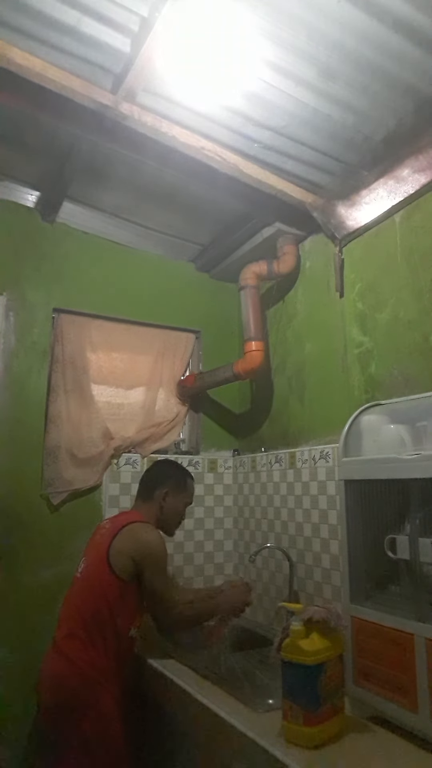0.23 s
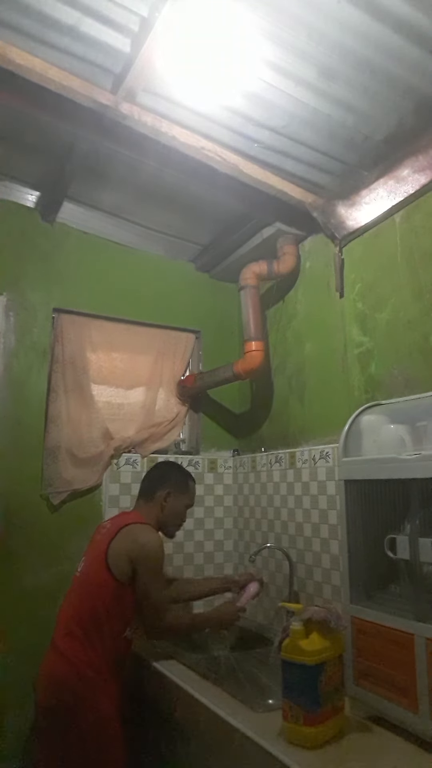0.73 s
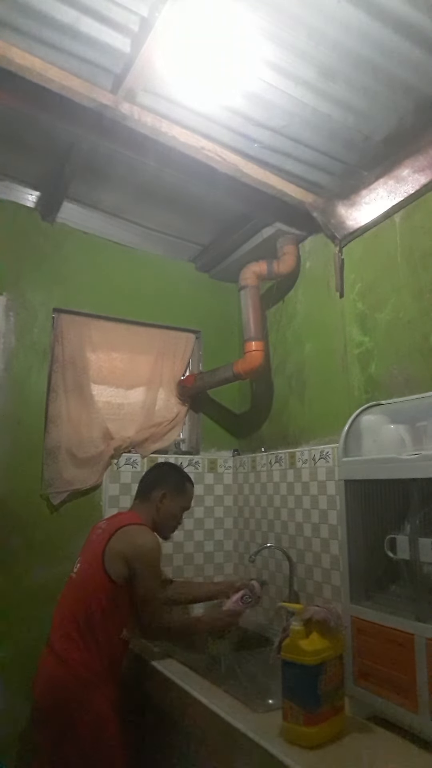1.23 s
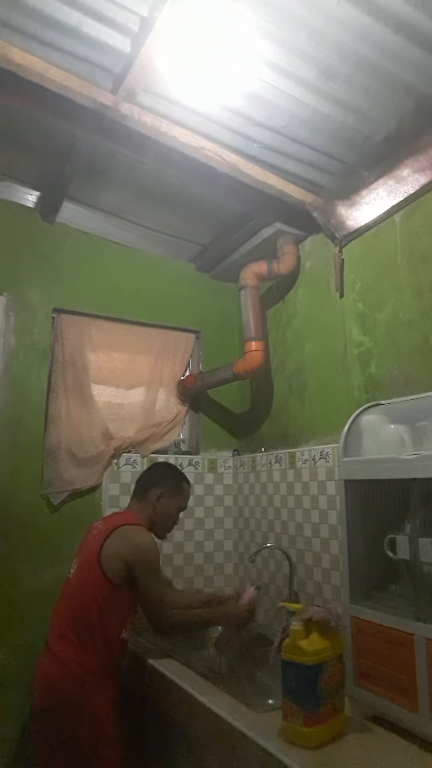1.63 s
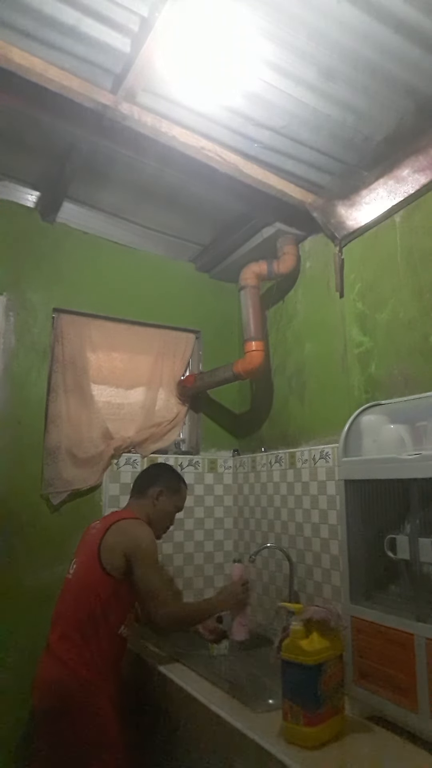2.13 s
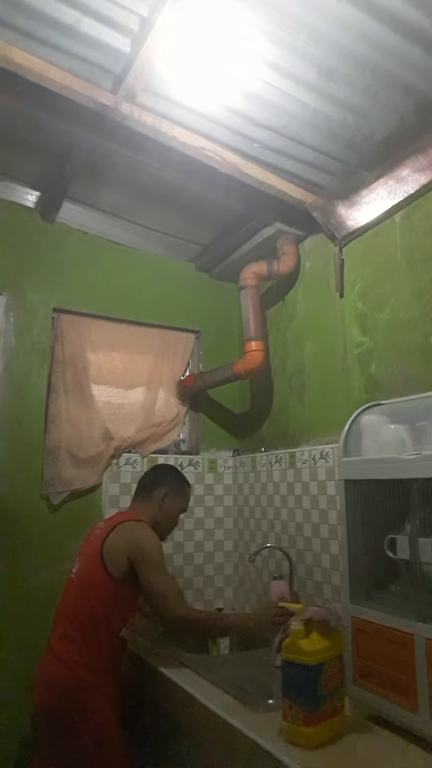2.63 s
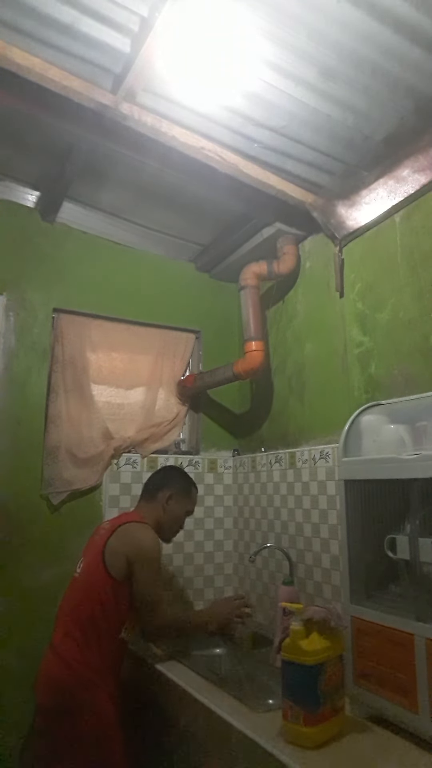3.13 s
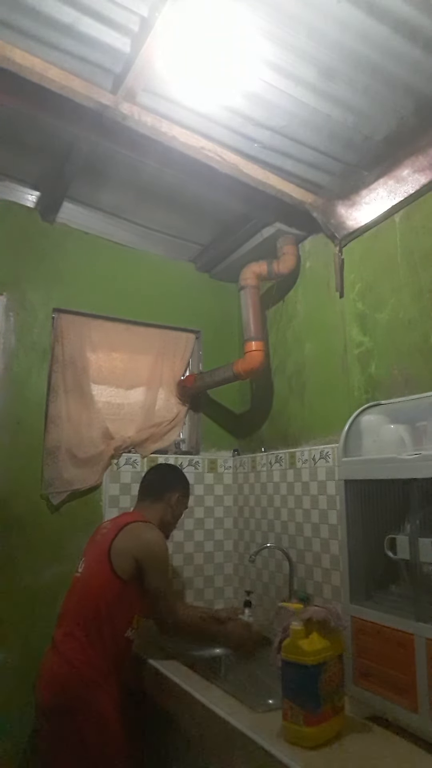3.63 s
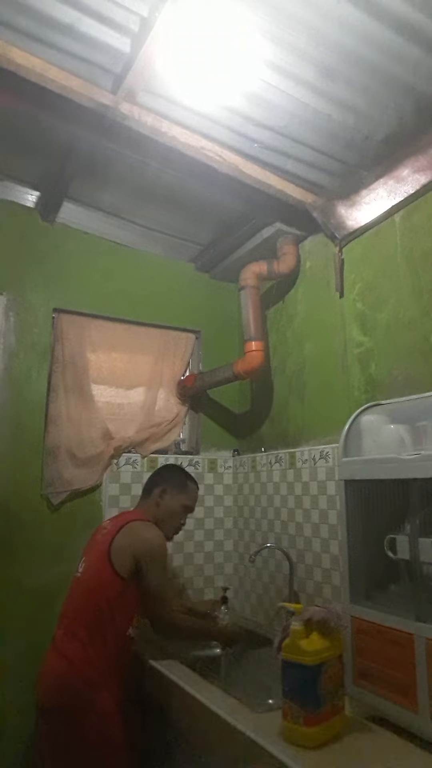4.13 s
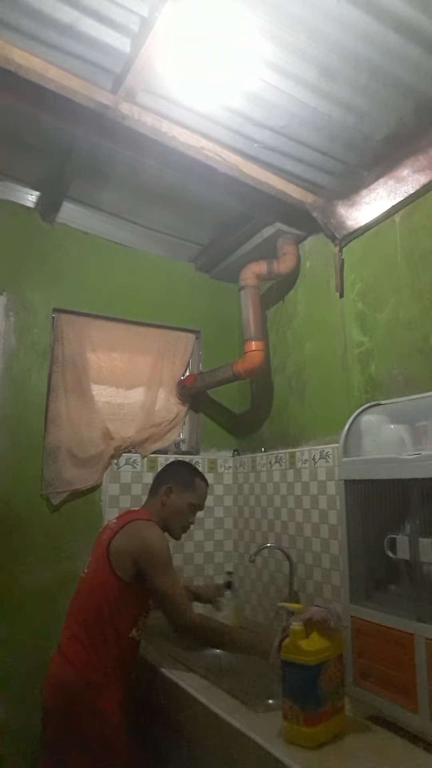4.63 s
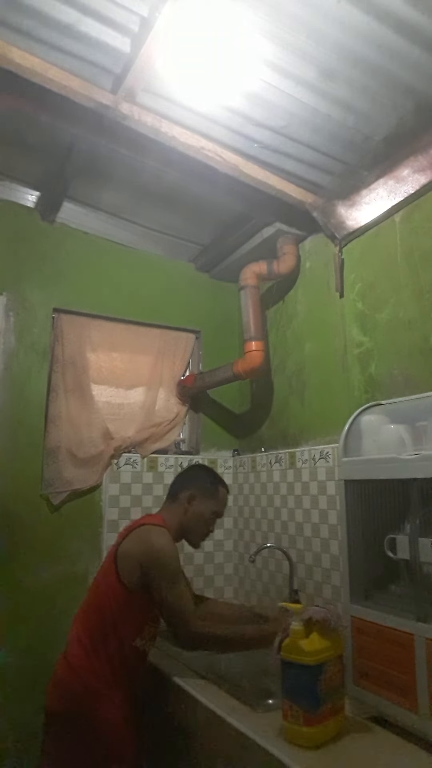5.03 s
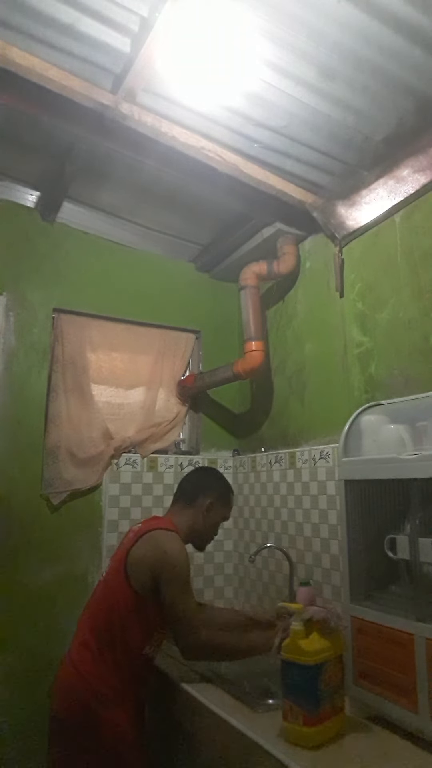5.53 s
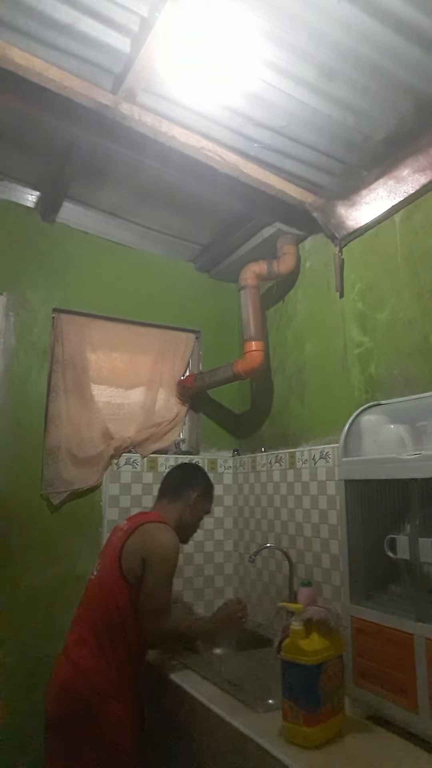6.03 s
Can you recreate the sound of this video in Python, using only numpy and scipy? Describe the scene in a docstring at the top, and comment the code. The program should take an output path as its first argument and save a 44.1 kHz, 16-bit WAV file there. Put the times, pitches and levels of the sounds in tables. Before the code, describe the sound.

Dishes handled in a metal kitchen sink: soft rubbing, small wet ticks and splashes, dull muffled knocks, one heavy thud near four seconds.

```python
"""Dishes in a metal sink

Hands move dishes in a metal sink on a kitchen counter, a couple of metres from a phone.
Rubbing and knocks are noise sent through the basin's resonances; thumps and rings are fading sine tones.
Wet ticks, splashes, rustle and fizz are filtered noise, over the microphone's own steady hiss."""
import sys
import numpy as np
from scipy import signal
from scipy.fft import rfft, irfft
from scipy.io import wavfile
from scipy.ndimage import uniform_filter1d

SR = 44100
rng = np.random.default_rng(int(sys.argv[2]) if len(sys.argv) > 2 else 0)


def amplitude_ratio(level_db):
    """Convert a level in decibels to the matching linear amplitude (field) ratio."""
    exponent = np.asarray(level_db, float) / 20
    return 10 ** exponent


def to_wav(sig):
    """Store sig (one row per channel, or 1-D mono) as 16-bit WAV at the path in sys.argv[1].

    Samples outside -1..1 are clipped; the rate is SR.
    """
    pcm = np.clip(np.atleast_2d(sig), -1, 1) * 32767
    pcm = np.round(pcm).astype(np.int16)
    wavfile.write(sys.argv[1], SR, pcm.T)  # frames by channels


N = 277389  # length of the scene in samples
SIZE = 1 << 15  # longest single event in samples
T = np.arange(SIZE) / SR  # time within an event in seconds


def unit(x):
    """Scale to an rms of 1."""
    return x / np.sqrt(np.mean(x ** 2))


def colour(x, points):
    """Filter by (pitch_hz, gain_db) points joined by straight lines on a log-frequency axis."""
    hz, db = np.transpose(points)
    f = np.fft.rfftfreq(len(x), 1 / SR) + 1  # the 1 avoids log(0)
    gain_db = np.interp(np.log(f), np.log(hz), db)
    return irfft(rfft(x) * amplitude_ratio(gain_db), len(x))


def fall(t, t60):
    """Exponential decay that loses 60 dB in t60 seconds."""
    return np.exp(-np.log(1000) * t / max(t60, .01))


def damp(after):
    """Gain that closes softly around a given time in seconds."""
    return 1 / (1 + np.exp(np.minimum((T - after) / 0.067, 50)))


def walk(rate):
    """Random levels drawn rate times a second, smoothed twice, with an rms of 1."""
    k = int(SR / rate)
    steps = np.repeat(rng.standard_normal(N // k + 1), k)
    smooth = uniform_filter1d(uniform_filter1d(steps, k), k)
    return unit(smooth[:N])


def add(out, x, s):
    """Mix x into out from time s in seconds."""
    i = int(s * SR)
    out[i:i + len(x)] += x[:len(out) - i]


# tone of the microphone hiss: pitch_hz, gain_db
HISS_TONE = [(59, -40), (100, -12), (181, -6.5), (276, -10), (615, -6.5), (2750, -9), (3330, -11),
             (4290, -12), (7420, -20.5), (15500, -12.5)]
HISS_DB = -71  # rms


def microphone_hiss():
    """Electronic noise of the microphone, unrelated left and right."""
    noise = rng.standard_normal((2, N))
    return amplitude_ratio(HISS_DB) * np.array([unit(colour(side, HISS_TONE)) for side in noise])


# clear resonances of basin and counter: pitch_hz, level_db (before the division by root t60), t60_s
BASIN_MODES = [(149.3, 3, 0.2), (164.3, -2.5, 0.75), (205.9, -2, 0.51), (233, -18, 0.32),
               (278.4, -4.5, 0.23), (320, 1.5, 0.45), (346.8, 3, 0.094), (419, -11, 0.12),
               (428.7, -5, 0.75), (480, -8.5, 0.17), (499, -24, .2), (565, -22.5, 0.089),
               (623.5, -11.5, 0.14), (710, -26, 0.39), (797, -16.5, 0.29), (863, -19.5, 0.17),
               (890, -16.5, 0.57), (983, -17, 0.14), (1140, -36, .15), (1272, -29, .15), (1560, -25, .15),
               (1690, -35, .15), (2250, -35, .12)]
# tone of the dense small resonances between them: pitch_hz, gain_db
SMALL_MODES = [(60, -16), (110, -2.5), (250, -7.5), (400, -3), (650, -11), (900, -22.5), (1300, -29.5),
               (3000, -61)]
SMALL_MODES_DB = 0.5  # against the clear resonances


def basin(push):
    """A push shakes the basin: clear ringing modes over a smooth mass of small ones."""
    ringing = np.zeros(SIZE)
    for hz, db, t60 in BASIN_MODES:
        ringing += amplitude_ratio(db) * np.sin(2 * np.pi * hz * T) * fall(T, t60) / np.sqrt(t60)
    clear = signal.fftconvolve(push, ringing[:SIZE // 2])[:len(push)]
    return unit(clear) + amplitude_ratio(SMALL_MODES_DB) * unit(colour(push, SMALL_MODES))


# hands at work, joined by straight lines: time_s, rubbing_db, stirred_water_db
HAND_WORK = [(0.0, -51, -66.5), (0.2, -56.5, -66.5), (0.4, -55.5, -68), (0.77, -57, -68.5),
             (1.2, -53.5, -68), (1.54, -57, -66.5), (1.89, -54, -67), (2.2, -61, -67), (2.6, -52.5, -66.5),
             (2.8, -54, -66.5), (3.1, -51, -65), (3.3, -58.5, -68), (3.56, -61, -70), (3.9, -58.5, -70),
             (4.1, -46.5, -63), (4.22, -56, -67.5), (4.4, -55.5, -65.5), (4.85, -51, -65.5),
             (5.05, -54, -66), (5.3, -46, -64.5), (5.62, -56.5, -66.5), (5.87, -49.5, -65),
             (6.05, -51, -65), (6.29, -53.5, -65.5)]
# tone of the water's rustle: pitch_hz, gain_db
RUSTLE_TONE = [(410, -33.5), (700, -2.5), (1050, -8), (1410, -6.5), (2120, -13), (4370, -21), (7000, -32),
               (9100, -53), (15400, -120)]
# tone of the foam's fizz: pitch_hz, gain_db
FIZZ_TONE = [(6000, -21), (8000, -20), (10000, -9.5), (11800, -3), (14000, -1), (15700, -2)]
FIZZ_DB = -6.5  # against the rustle
# the rumble has this level when the rubbing is at rest level, and follows a share of its rise above that
RUMBLE_DB, RUMBLE_SHARE, RUB_REST_DB = -62, 0.66, -56


def work():
    """Uneven rubbing through the basin, rumble of the counter, rustle and fizz of soapy water."""
    s, *columns = np.transpose(HAND_WORK)
    rub_db, water_db = (np.interp(np.arange(N) / SR, s, c) for c in columns)
    jolts = walk(25.193)  # small slips shake rubbing, rustle and fizz at once
    noise = rng.standard_normal((4, N))

    rub = basin(noise[0] * amplitude_ratio(1.9 * jolts + 1.4 * walk(90)))
    rub = colour(rub, [(100, -3.0), (200, -1.0), (600, 3), (1000, 6.0), (2000, -20.5), (5000, -47)])
    rumble = colour(noise[1], [(20, -42.0), (40, -38), (60, -1.5), (75, 9.5), (90, 3.0), (120, -17),
                               (180, -32.0), (400, -80.0)])
    rustle = colour(noise[2] * amplitude_ratio(0.77 * jolts + 1.3 * walk(120)), [(300, -56)] + list(RUSTLE_TONE))
    fizz = colour(noise[3] * amplitude_ratio(.8 * jolts + 1.1 * walk(60)), [(4000, -55)] + list(FIZZ_TONE))

    rumble_db = RUMBLE_DB + RUMBLE_SHARE * (rub_db - RUB_REST_DB)
    water = unit(rustle) + unit(fizz) * amplitude_ratio(FIZZ_DB)
    return unit(rub) * amplitude_ratio(rub_db) + unit(rumble) * amplitude_ratio(rumble_db) + water * amplitude_ratio(water_db)


# short splashes: start_s, level_db (of the hiss before it swells and fades), centre_hz
SPLASH_EVENTS = [(0.0, -62, 2670), (0.175, -70, 4530), (0.6084, -71, 3480), (1.137, -63.5, 3200),
                 (1.2077, -68.5, 3550), (1.5893, -70, 4400), (2.1694, -73, 4030), (2.6298, -74, 3830),
                 (4.179, -69, 3470), (4.4186, -68, 3060)]
SPLASH_T60_S = 0.26


def splashes():
    """Water squeezed from a sponge: hiss in a narrow band with a soft lower skirt."""
    out = np.zeros(N)
    shape = (1 - np.exp(-T / 0.003)) * fall(T, SPLASH_T60_S)
    for s, db, hz in SPLASH_EVENTS:
        edges = hz * np.array([.5, .9, 1.1, 1.35])
        band = unit(colour(rng.standard_normal(SIZE), list(zip(edges, [-21, -8, -8.0, -29]))))
        add(out, band * shape * amplitude_ratio(db), s)
    return out


# wet ticks: start_s, gain_db, share_around_3khz_db
TICK_EVENTS = [(0.1146, -58.5, -2), (1.1338, -53, -14), (1.4481, -65.5, -8), (1.9649, -56, -8),
               (2.2144, -61, -10), (2.4114, -69.5, -6), (2.4743, -63.5, -11), (2.9976, -58, -15),
               (3.9036, -48, 1), (4.206, -63, -12), (4.3294, -58, 0), (4.403, -58.5, -11),
               (5.5273, -59, -11), (5.8416, -53.5, -10)]
TICK_T60_S = 0.092


def ticks():
    """Tiny wet clicks: a puff of high hiss with a duller part."""
    out = np.zeros(N)
    for s, db, low_db in TICK_EVENTS:
        puff = rng.standard_normal(SIZE) * (1 - np.exp(-T / 0.0041)) * fall(T, TICK_T60_S)
        puff = colour(puff, [(1500, low_db - 21), (2500, low_db), (5000, low_db - 1.0), (8000, -26),
                             (11000, -5.0), (14000, 0.5), (15700, 0)])
        add(out, puff[:SIZE // 2] * amplitude_ratio(db), s)
    return out


T60_PER_LENGTH = 3.8  # what is damped later also fades slower
WAVER_DB, WAVER_PITCH, WAVER_PER_S = 1.14, 0.014, 70  # at waver 1; the pitch part is a fraction


def notes(table, swell_s, cycles, waver):
    """A lone resonance swells, may waver, fades and is damped; its time is half a swell after its start."""
    out = np.zeros(N)
    level, pitch = waver * walk(WAVER_PER_S), waver * walk(WAVER_PER_S)
    for s, db, hz, stop in table:
        swell = swell_s + cycles / hz
        shape = (1 - np.exp(-(T / swell) ** 2)) * fall(T, T60_PER_LENGTH * stop) * damp(stop)
        now = np.minimum(int(s * SR) + np.arange(SIZE), N - 1)
        phase = 2 * np.pi * hz * np.cumsum(1 + WAVER_PITCH * pitch[now]) / SR
        loudness = amplitude_ratio(db + WAVER_DB * level[now]) * shape / shape.max()
        add(out, loudness * np.sin(phase), s - swell / 2)
    return out


# low thumps of the counter: time_s, peak_db, pitch_hz, damped_after_s
THUMP_EVENTS = [(0.096, -50, 77.5, 0.12), (2.16, -49.5, 77, 0.078), (2.551, -31.5, 95.4, 0.068),
                (2.638, -36, 69.8, 0.2), (2.749, -40.5, 71.6, 0.17), (2.92, -49.5, 71, 0.12),
                (3.905, -18.5, 85.7, 0.1), (4.032, -22.5, 89.2, 0.065), (4.099, -28.5, 86.8, 0.11),
                (4.73, -36.5, 72.5, 0.047), (4.848, -39.5, 68.4, .1), (4.89, -32, 74.4, 0.046),
                (4.939, -35.5, 82, 0.052), (5.176, -31, 77, 0.091), (5.269, -38.5, 90.4, 0.26),
                (5.423, -31.5, 87.4, .11), (5.549, -43.5, 73.8, 0.32), (5.659, -46, 87, 0.087),
                (5.879, -40.5, 64.4, 0.25), (6.049, -34, 75.8, 0.087), (6.12, -41.5, 73.4, 0.088)]


def thumps():
    """The heavy counter gives a low steady tone that swells in a set time."""
    return notes(THUMP_EVENTS, swell_s=0.0094, cycles=0, waver=0)


# one resonance of basin or dish singing out: time_s, peak_db (before wavering), pitch_hz, damped_after_s
RING_EVENTS = [(0.11, -49, 468, 0.029), (0.39, -53.5, 320, 0.078), (0.593, -47, 324.8, 0.18),
               (0.634, -46, 329.7, 0.051), (0.849, -68, 1760, .05), (0.86, -52, 293, 0.25),
               (1.03, -44, 167, 0.045), (1.037, -53, 576, .06), (1.125, -47, 318.5, 0.067),
               (1.189, -46.5, 337, .08), (1.253, -52, 356, .075), (1.369, -67, 1640, .05),
               (1.447, -47, 324, 0.1), (1.523, -46, 334, 0.053), (1.608, -53, 151, 0.093),
               (1.672, -46.5, 320, 0.14), (1.799, -49, 227, 0.16), (2.084, -48, 329.6, 0.12),
               (2.207, -46.5, 440, 0.035), (2.209, -52, 630, 0.054), (2.37, -52, 424, 0.2),
               (2.457, -64.5, 1153, .047), (2.565, -34.5, 202, 0.09), (2.581, -40.5, 546, 0.023),
               (2.619, -39.5, 418, 0.046), (2.917, -46.5, 509, 0.044), (3.015, -47.5, 444, 0.11),
               (3.099, -50, 312, 0.26), (3.76, -51, 320, 0.24), (3.904, -35, 770, 0.043),
               (3.909, -19.5, 272.6, 0.054), (3.964, -39.5, 843, 0.08), (4.048, -33.5, 302.6, .14),
               (4.398, -52.5, 616, .095), (4.563, -49, 637, .06), (4.568, -39, 421, 0.053),
               (4.864, -49.5, 610, 0.045), (5.179, -38.5, 340, .08), (5.179, -50, 557, 0.12),
               (5.404, -33, 202, 0.099), (5.406, -39, 548, 0.045), (5.811, -55, 524, .073),
               (5.899, -41.5, 481.5, 0.035), (6.046, -48.5, 627, 0.07), (6.054, -38.5, 142, 0.039),
               (6.189, -48, 462, 0.18)]


def rings():
    """Basin or dish sings; water sloshing in the basin makes it waver. Low rings swell slower."""
    return notes(RING_EVENTS, swell_s=0.00596, cycles=2.04, waver=0.94)


# things set down or bumped: start_s, loudest_moment_db (rms of the dull part), deep_part_db (tone setting),
# bright_part_db (against the dull part), shaking_t60_s
KNOCK_EVENTS = [(0.009, -56.5, -11, -5.5, .14), (0.108, -49.5, -11.5, -12, 0.41),
                (0.208, -54.5, -15, -7.5, 0.42), (0.703, -59.5, -30, -8, 0.41), (0.948, -57, -21, -17, 1),
                (1.139, -52.5, -6, -10.5, 0.62), (1.455, -56.5, -26, -15, 0.95),
                (1.579, -51.5, -7, -13.5, .6), (2.114, -52.5, -9.5, -21.5, 0.87),
                (2.208, -50, -29, -12.5, .48), (2.245, -47.5, -12, -12.5, 0.12),
                (2.296, -50, -24, -18, 0.57), (2.459, -55, -28, -11, 0.39), (2.544, -44, -10, -9, 0.16),
                (2.558, -38, -6, -12.5, 0.83), (2.912, -51.5, -31, -2, 0.38), (3.009, -50.5, -26, -8, 0.64),
                (3.066, -50.5, -42, -7, 0.67), (3.894, -32.5, -2, -9, 0.19), (3.913, -24.5, -5.5, -15, 0.7),
                (4.04, -33, -3, -24, 0.87), (4.334, -51.5, -6, -11, 0.93), (4.398, -47, -25, -18, 0.27),
                (4.554, -48.5, -25, -5, 0.46), (4.768, -51.5, -14, -10.5, 0.22),
                (4.838, -52, -12, -12, 0.26), (4.866, -45.5, 3.5, -17, 0.44), (5.0, -46.5, -12, -9.5, 0.31),
                (5.16, -52, -20, -9, .2), (5.176, -38.5, -7.5, -16.5, 0.51), (5.393, -39, -35, -10, 0.32),
                (5.419, -39, -22, -14, 0.47), (5.526, -46.5, -6, -11, 0.82), (5.809, -49.5, -20, -8, 1),
                (5.868, -44.5, -11, -13, 0.22), (5.899, -43, -1, -22, 0.21), (6.044, -46.5, -17, -14, 0.9),
                (6.174, -52.5, -10, -18, 1)]
# tone of the broad crack of hard contact: pitch_hz, gain_db
CRACK_TONE = [(350, -10), (650, 0), (900, -4.5), (1200, -7.5), (1800, -12.5), (2400, -19.5), (3200, -29.5),
              (5000, -39.5), (8000, -52.5)]
# a hand damps each knock after a base time plus a share of its t60
HAND_S, HAND_SHARE = 0.076, 0.082


def knocks():
    """Each blow is a firm first contact, then a rattling push that dies or is damped by a hand."""
    out = np.zeros(N)
    onset = 1 - np.exp(-(T / 0.0004) ** 2)
    for s, db, deep_db, bright_db, t60 in KNOCK_EVENTS:
        stop = HAND_S + HAND_SHARE * t60
        push = rng.standard_normal((2, SIZE)) * damp(stop) * (1 - np.exp(-T / .002))

        first_contact = 1 + 0.51 * fall(T, 0.028)
        dull = basin(push[0] * first_contact * fall(T, t60))
        dull = colour(dull, [(90, deep_db - 3), (140, deep_db + 3), (220, deep_db + 7.5), (270, -1.5),
                             (700, 0.5), (1200, -0.5), (2500, 1.0), (4000, -41.5)])

        sharp = push[1] * (1 - np.exp(-T / 0.0067)) * fall(T, 0.81 * t60) * damp(1.12 * stop)
        sharp = colour(sharp, CRACK_TONE)

        for part, part_db in ((dull, db), (sharp, db + bright_db)):
            loudest = np.sqrt(uniform_filter1d(part ** 2, size=1500).max())  # rms over 34 ms
            add(out, (part * onset)[:SIZE // 2] * amplitude_ratio(part_db) / loudest, s)
    return out


def scene():
    """Everything reaches both microphone ports alike."""
    sink = work() + splashes() + ticks() + thumps() + rings() + knocks()
    return np.array([sink, sink])


def roll_off(x):
    """The treble ends steeply here."""
    return signal.sosfilt(signal.butter(12, 15690, fs=SR, output="sos"), x)


def record(dry):
    """The microphone drops the deepest bass, and each channel adds its own hiss."""
    bass_cut = signal.butter(4, 48, "high", fs=SR, output="sos")
    mix = signal.sosfilt(bass_cut, dry) + microphone_hiss()
    return roll_off(mix)


dry = scene()
out = record(dry)
to_wav(out)
```